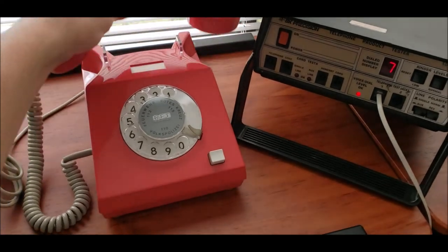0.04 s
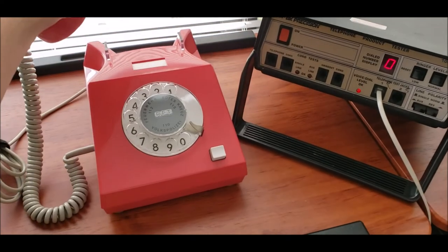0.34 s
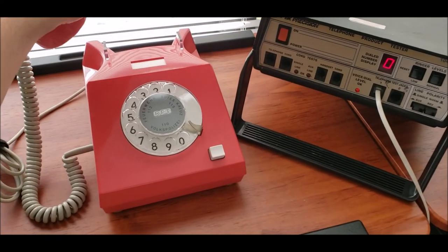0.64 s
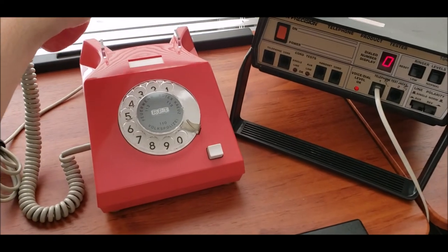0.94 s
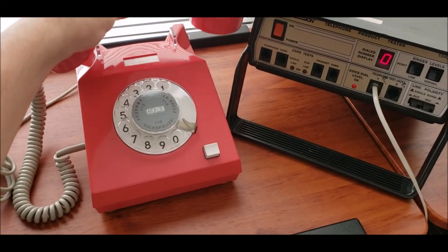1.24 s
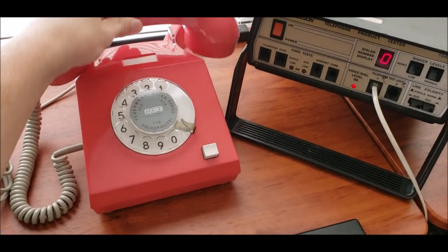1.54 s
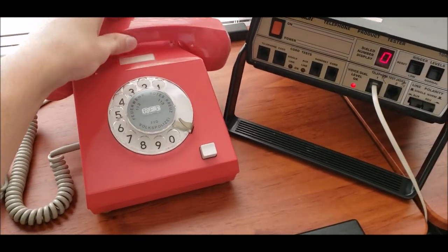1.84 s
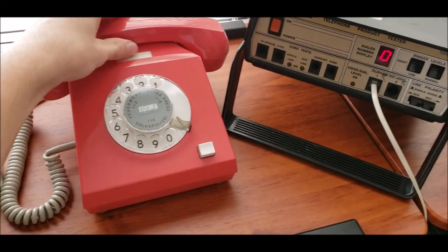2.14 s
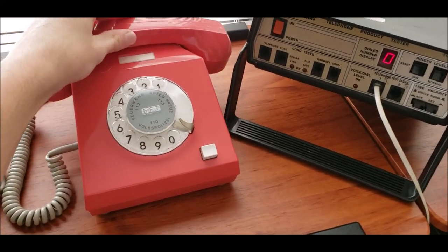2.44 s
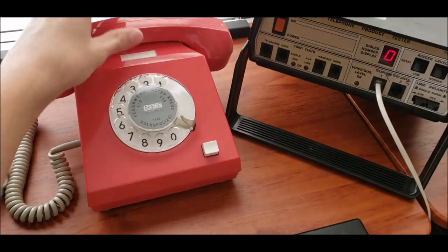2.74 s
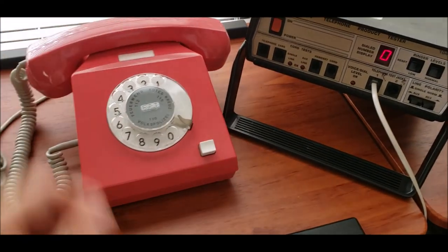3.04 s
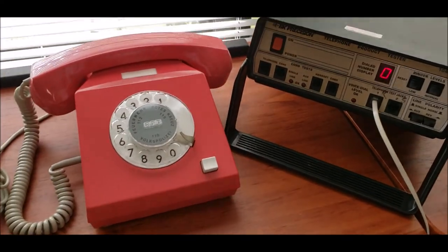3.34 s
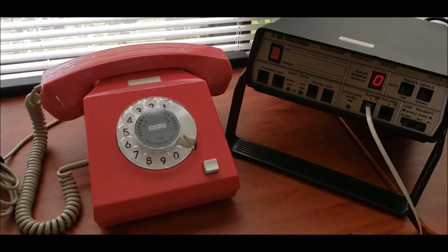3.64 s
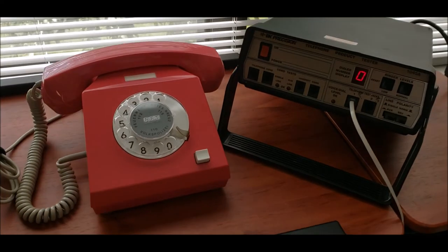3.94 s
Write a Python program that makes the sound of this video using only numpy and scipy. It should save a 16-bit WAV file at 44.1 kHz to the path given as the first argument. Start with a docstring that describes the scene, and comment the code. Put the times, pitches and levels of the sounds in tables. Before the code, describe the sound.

A telephone handset is put down on its cradle in a small room. At first the phone's faint, high bell tone is dying away, with a light click. From about 1.4 to 2.2 seconds the handset settles with five hollow plastic knocks mixed with bright switch clicks. One more sharp click comes at 2.5 seconds. A low hum and soft room noise grow louder and continue until 4 seconds.

```python
"""A small room with a low hum, where the two bell gongs of a desk telephone are ringing out. The plastic
handset is lowered onto its cradle and knocks five times as it settles, each knock a crack, a ping and the ring
of the hollow case. The hook switch and line relays click. The room answers each blow with a short tail, and the
background noise grows louder towards the end."""
import sys
import numpy as np
from scipy import signal
from scipy.fft import rfft, irfft
from scipy.io import wavfile

SR = 44100
rng = np.random.default_rng(int(sys.argv[2]) if len(sys.argv) > 2 else 0)


def pcm_store(signal):
    """Save signal as 16-bit PCM."""
    levels = np.round(np.clip(np.atleast_2d(signal), -1, 1) * 32767)
    wavfile.write(sys.argv[1], SR, levels.astype(np.int16).T)


N = 176400
SIDES = np.array([[1], [-1]])  # left, right


def undb(db):
    """Decibels to gain."""
    return 10 ** (np.asarray(db) / 20)


def along(hz, points):
    """Read (frequency, value) points on a log-frequency axis."""
    freqs, values = np.array(points, float).T
    return np.interp(np.log(np.maximum(hz, 1)), np.log(freqs), values)


def fader(points):
    """Gain over time from (time, level) points."""
    return undb(np.interp(np.arange(N) / SR, *np.array(points).T))


def unit(x):
    """Scale to rms 1."""
    return x / np.sqrt(np.mean(x ** 2))


def pan(db):
    """Stereo gains with the left louder by db."""
    return undb(SIDES * db / 2)


def decay(t, t60):
    """Fall by 60 dB in t60 seconds, 1 ms at the shortest."""
    return np.exp(-np.log(1000) * t / np.maximum(t60, 1e-3))


# partials of the two gongs (frequency [Hz], level [dB], t60 [s], pan left [dB])
GONG_PARTIALS = [(2068, -63, 4.2, 2), (2095, -67, 9.9, -5), (2385, -56, 6.8, 4.5), (2455.5, -51, 6.3, -4.5),
                 (5344, -49.5, 2.15, 14), (6130, -64, 2.9, 6), (9530, -40.5, 0.55, -12),
                 (10860, -51.5, 1.08, -15), (10871, -45.5, 0.83, 4.5), (14480, -60, .35, -10)]
# fader ride on top of their decay (time [s], level [dB])
GONG_RIDE = [(0, -4.5), (.1, -2.5), (.2, -2.5), (.35, -.5), (.6, -2), (4, -1.5)]

def gongs():
    """Already ringing, close pairs of partials beat as the gongs die away, the highs first."""
    t, partials = np.arange(N) / SR, 0
    for hz, db, t60, pan_db in GONG_PARTIALS:
        phase = 2 * np.pi * (hz * t + rng.random()) + np.array([[0], [1]])  # right leads by 1 rad
        partials += np.sqrt(2) * undb(db) * pan(pan_db) * decay(t, t60) * np.sin(phase)
    return partials * fader(GONG_RIDE)


# likeness of left and right in the room (frequency [Hz], correlation [0-1])
STEREO_LIKENESS = [(100, .96), (300, 0.92), (600, 0.47), (1200, 0), (4000, 0), (12000, 0)]

def diffuse(spectrum, size):
    """Stereo noise with a given spectrum, centred in the bass and wide in the treble."""
    hz = np.fft.rfftfreq(size, 1 / SR)
    likeness = np.clip(along(hz, STEREO_LIKENESS), 0, 1)
    mid, side = rfft(rng.standard_normal((2, size)))
    stereo = mid * np.sqrt(1 + likeness) + side * np.sqrt(1 - likeness) * SIDES
    return irfft(spectrum(hz) * stereo, size)


# colour of the early and late room noise (frequency [Hz], relative level [dB])
EARLY_EQ = [(25, -17), (38, -13), (56, 2.5), (75, -5), (150, -6.5), (240, -4.5), (416, -9), (560, -15.5),
            (960, -16), (2000, -18), (2500, -19.5), (3100, -31.5), (5400, -26), (7500, -31.5),
            (8500, -37.5), (16000, -44.5)]
LATE_EQ = [(25, -28), (38, -27), (52, 2.5), (70, -10), (150, -13), (260, -8), (340, -14.5), (440, -12.5),
           (600, -19), (1000, -19), (1600, -23.5), (2400, -26), (3000, -38.5), (4600, -35), (7300, -38),
           (8500, -47.5), (11500, -50.5), (16000, -51)]
# their fader rides (time [s], level [dB])
EARLY_RIDE = [(0, -58), (.6, -60.5), (1.102, -60.5), (1.4, -59), (1.85, -56.5), (2.3, -65), (2.7, -71),
              (4, -59)]
LATE_RIDE = [(0, -78), (1.2, -73), (1.85, -62.5), (2.15, -56), (2.352, -52.5), (2.7, -49.5), (3.0, -49.5),
             (3.35, -50.5), (3.65, -51), (4, -49.5)]

def room_tone():
    """A quiet bed of background noise gives way to a fuller one."""
    early = unit(diffuse(lambda f: undb(along(f, EARLY_EQ)), N))
    late = unit(diffuse(lambda f: undb(along(f, LATE_EQ)), N))
    return early * fader(EARLY_RIDE) + late * fader(LATE_RIDE)


def waver(hz, width_hz):
    """A narrow, steep-sided band of noise, heard as an unsteady tone."""
    return unit(diffuse(lambda f: 1 / (1 + (2 * (f - hz) / width_hz) ** 4), N))


# the room's low hum (frequency [Hz], width [Hz], level [dB])
HUM_BANDS = [(56.3, 8.9, -63.5)]
# fader ride on top of that (time [s], level [dB])
HUM_RIDE = [(0, -1.5), (1.3, 3.5), (2.1, 4), (2.7, 6.5), (4, 8.5)]

def hum():
    """A wavering low hum that slowly swells."""
    return sum(undb(db) * waver(hz, width) for hz, width, db in HUM_BANDS) * fader(HUM_RIDE)


# the drone's swells and dips (time [s], level [dB])
DRONE_RIDE = [(0.0, -71), (0.07, -80), (0.17, -59.5), (0.61, -79.5), (0.69, -56.5), (1.04, -68.5),
              (1.51, -59.5), (1.6, -78), (1.74, -57.5), (2.12, -70.5), (2.29, -55), (2.84, -63.5),
              (3.01, -47), (3.15, -69.5), (3.6, -48), (4.0, -70)]

def drone(trim_db=-0.5):
    """A narrow drone that comes and goes."""
    tone = signal.hilbert(waver(hz=211.05, width_hz=4.1))
    compressed = unit(tone.real / np.sqrt(np.abs(tone)))  # 2:1 on its own flutter
    return undb(trim_db) * compressed * fader(DRONE_RIDE)


# colour that the plastic gives every crack (frequency [Hz], gain [dB])
PLASTIC_EQ = [(80, -2), (250, -11.5), (450, 8.5), (780, -7), (1080, 0.5), (2300, -0.5), (3100, -3),
              (5300, 1), (6600, -2.5), (7600, -3.5), (8800, -7), (11500, -4.5), (15500, -9.5)]
# crack bands: low mids, upper mids, treble, top
BAND_HZ, BAND_WIDTH_HZ = (450, 1400, 4500, 11500), (450, 1800, 4500, 9000)

def crack(band_db, t60, rise_s, size=8192):
    """Hard surfaces chatter for a few milliseconds, coloured by the plastic."""
    chatter_db, chatter_s, trim_db = 1.5, 0.000599, -4.5
    t, hz = np.arange(size) / SR, np.fft.rfftfreq(size, 1 / SR)
    chatter = undb(chatter_db * np.interp(t / chatter_s, np.arange(size), rng.standard_normal(size)))
    envelope = (1 - np.exp(-(t / rise_s) ** 2)) * decay(t, t60) * chatter
    envelope *= np.sqrt(.03 * SR / np.sum(envelope ** 2))  # same energy, long or short
    mid, side = rfft(envelope * rng.standard_normal((2, size)))
    density_db = np.array(band_db) + 10 * np.log10(SR / 2 / np.array(BAND_WIDTH_HZ))
    eq = undb(trim_db + along(hz, list(zip(BAND_HZ, density_db))) + along(hz, PLASTIC_EQ))
    width = 0.8 * hz / (hz + 1000)  # the stereo image opens towards the top
    return irfft(eq * (mid + width * side * SIDES))[:, :size // 2]


def ping(hz, db, t60=0.011, rise_s=0.00058):
    """The part that makes contact rings for a moment."""
    t = np.arange(SR // 8) / SR
    return undb(db) * decay(t, t60) * (1 - np.exp(-t / rise_s)) * np.sin(2 * np.pi * hz * t)


def add(out, start, sound):
    """Mix a sound in at its cue."""
    i = int(start * SR)
    out[:, i:i + sound.shape[-1]] += sound[..., :N - i]


# switch and relay cues (time [s], ping pitch [Hz], ping level [dB], four crack band levels [dB],
# crack t60 [s], crack rise [s], pan left [dB])
SWITCH_CUES = [(.101, 1370, -48, -62.5, -50.5, -49.5, -42, 0.036, .003, 1),
               (1.3808, 4800, -38, -60.5, -52.5, -47, -64, 0.045, 0.0012, -1),
               (1.744, 2340, -35, -52, -49, -44.5, -46.5, 0.023, 0.0012, 0.5),
               (1.909, 2380, -35.5, -64, -53, -43.5, -44, 0.031, 0.0024, 0.5),
               (2.1604, 1110, -38, -56, -53.5, -49.5, -45.5, .04, 0.0011, .5),
               (2.548, 2300, -29, -54, -49.5, -37.5, -39.5, 0.031, 0.0019, 2)]

def switches():
    """The hook switch and line relays give bright clicks, too light to ring the case."""
    out = np.zeros((2, N))
    for start, ping_hz, ping_db, *band_db, t60, rise_s, pan_db in SWITCH_CUES:
        add(out, start, pan(pan_db) * crack(band_db, t60, rise_s))
        add(out, start, pan(pan_db) * ping(ping_hz, ping_db))
    return out


# the room's decay by band, negative for no tail (frequency [Hz], t60 [s])
REVERB_DECAY = [(150, -0.24), (500, -0.54), (2000, 0.2), (6000, 0.27), (14000, 0.29)]
# colour of the reverb (frequency [Hz], level [dB])
REVERB_EQ = [(150, -32), (500, -2.5), (2000, -4.5), (6000, -9.5), (14000, -7)]

def reverb(dry, onset_s=0.0055, size=22050):
    """The small room answers with a short diffuse tail, each band with its own decay."""
    t, tail = np.arange(size) / SR, 0
    centres = [hz for hz, _ in REVERB_DECAY]
    for share, (_, t60) in zip(np.eye(len(centres)), REVERB_DECAY):
        crossover = list(zip(centres, share))
        band = diffuse(lambda f: np.sqrt(along(f, crossover)) * undb(along(f, REVERB_EQ)), size)
        envelope = decay(t, t60) * (1 - np.exp(-(t / onset_s) ** 2))
        tail += band * envelope / np.sqrt(np.sum(envelope ** 2))
    return signal.fftconvolve(dry, tail, axes=1)[:, :N]


# modes of the hollow case (frequency [Hz], relative level [dB], t60 [s])
CASE_MODES = [(106, -28, 0.094), (148, -22, .08), (256, -19, 0.02), (387, -6, .06), (418.8, 0.5, 0.05),
              (441.8, -15, 0.24), (489, -5, 0.099), (523, -5, 0.041), (631, -7.5, 0.044),
              (1017, -11, 0.069), (1050, -12.5, 0.027), (1360, -27, .03), (1572, -10, 0.034),
              (1950, -23, .015), (2250, -12, 0.022)]

def case_ring(ring_db, spot_hz, tilt_db, favour_db=7.5, favour_octaves=0.075, push_s=0.0033):
    """A knock rings the case, most of all the modes that move at the struck spot."""
    t, ring = np.arange(SR // 3) / SR, 0
    for hz, db, t60 in CASE_MODES:
        octaves = np.log2(hz / spot_hz)
        boost_db = tilt_db * octaves + favour_db * np.exp(-(octaves / favour_octaves) ** 2)
        ring += undb(ring_db + db + boost_db) * decay(t, t60) * np.sin(2 * np.pi * hz * t)
    return ring * (1 - np.exp(-t / push_s))


# handset knocks (time [s], ring level [dB], pitch the spot favours [Hz], ring tilt [dB/octave],
# rebound delay [s], rebound gain [dB], ping pitch [Hz], ping level [dB],
# four crack band levels [dB], crack t60 [s])
KNOCK_CUES = [(1.469, -42, 367, 6, 0.0055, -6, 2280, -37, -56.5, -46, -49.5, -58.5, 0.032),
              (1.5288, -30, 523, 2.5, 0.0036, -8, 1600, -33.5, -39, -41.5, -48, -51.5, .04),
              (1.6993, -26, 557, -2.5, 0.0074, -8, 1110, -52, -50, -50, -51.5, -56.5, 0.084),
              (1.9547, -26, 426, -6, .034, -14.5, 1570, -23.5, -43, -42, -41.5, -43.5, 0.026),
              (2.1139, -36.5, 474, 0, .0105, -10, 11200, -40, -47.5, -43, -62.5, -44.5, 0.047)]

def handset():
    """Each knock cracks and pings at the contact and rings the case; a softer rebound follows."""
    out = np.zeros((2, N))
    for (start, ring_db, spot_hz, tilt_db, rebound_s, rebound_db,
         ping_hz, ping_db, *band_db, t60) in KNOCK_CUES:
        ring = case_ring(ring_db, spot_hz, tilt_db)
        add(out, start, ring)
        add(out, start + rebound_s, undb(rebound_db) * ring)
        add(out, start, ping(ping_hz, ping_db))
        add(out, start, crack(band_db, t60, rise_s=.0011))
    return out


def scene(right_lag_s=.0001):
    """Gongs and blows over the room's bed; the blows arrive left first and feed the reverb."""
    blows = handset() + switches()
    direct = np.array([blows[0], np.roll(blows[1], int(right_lag_s * SR))])
    return gongs() + direct + reverb(blows) + room_tone() + hum() + drone()


def record(dry, top_hz=16000):
    """A steep low-pass takes the very top off the mix."""
    return signal.sosfilt(signal.ellip(10, .2, 70, top_hz, fs=SR, output="sos"), dry)


dry = scene()
out = record(dry)
pcm_store(out)
```